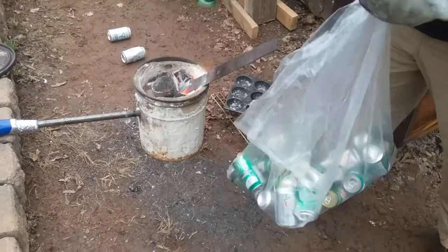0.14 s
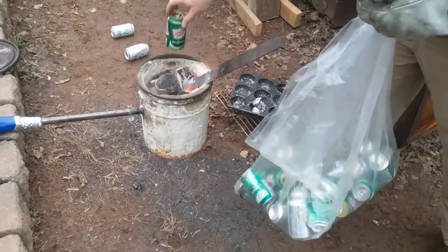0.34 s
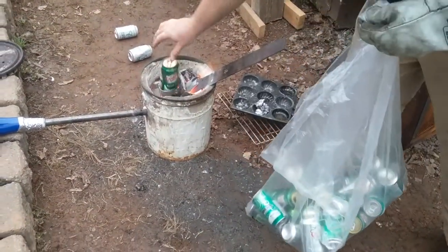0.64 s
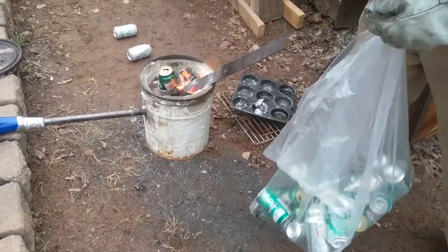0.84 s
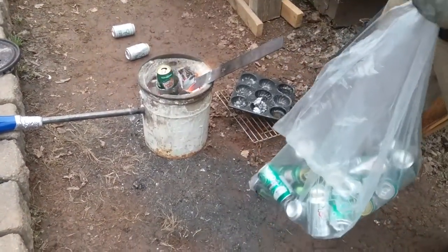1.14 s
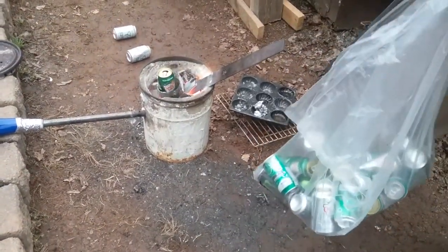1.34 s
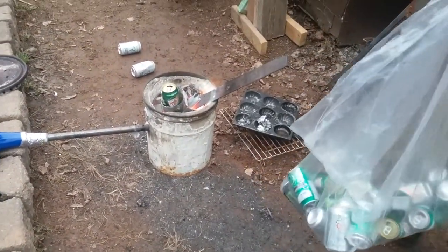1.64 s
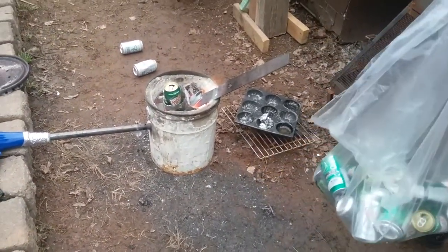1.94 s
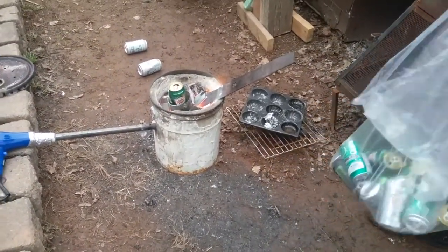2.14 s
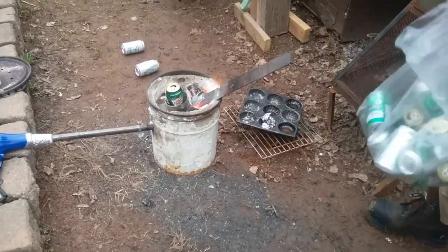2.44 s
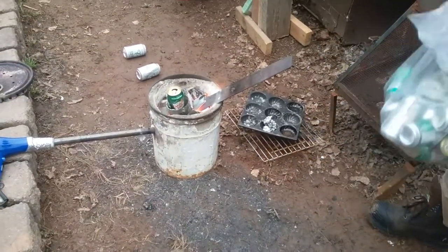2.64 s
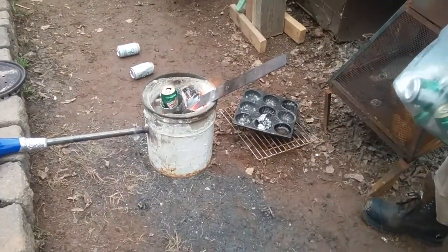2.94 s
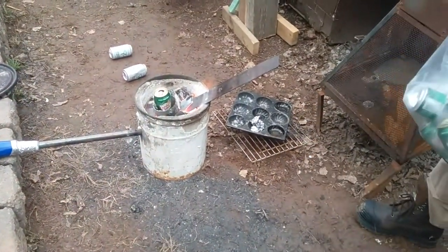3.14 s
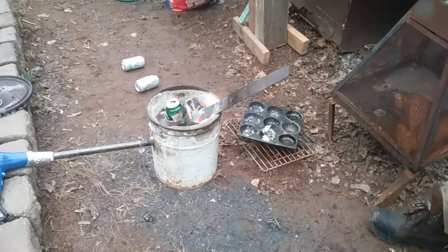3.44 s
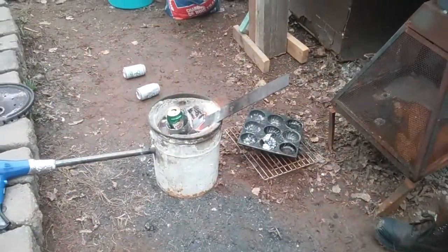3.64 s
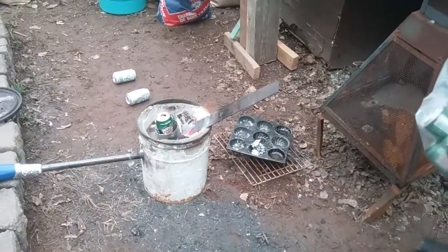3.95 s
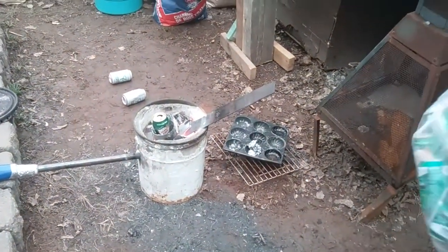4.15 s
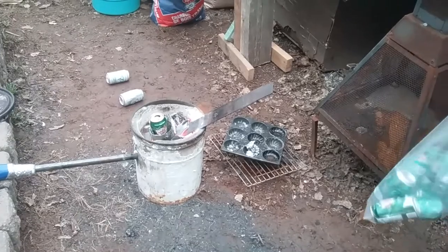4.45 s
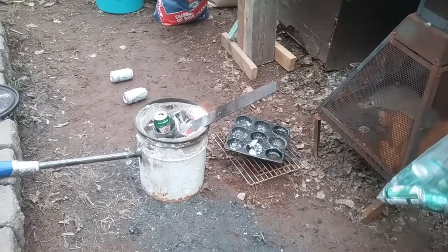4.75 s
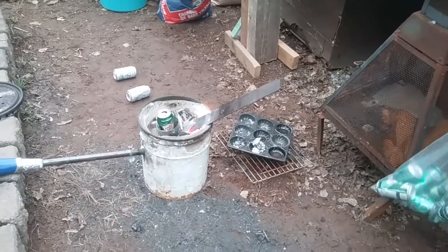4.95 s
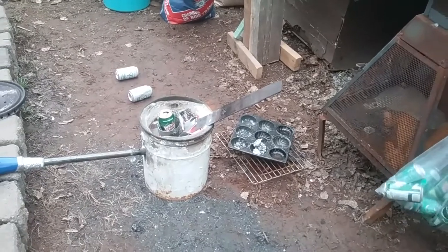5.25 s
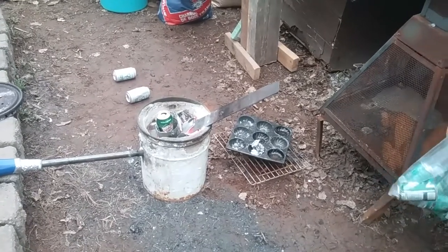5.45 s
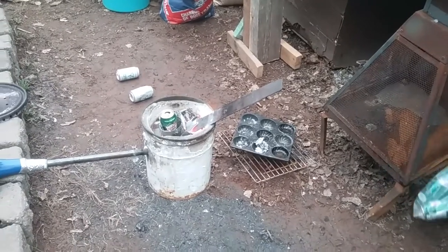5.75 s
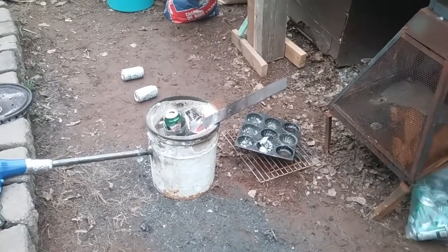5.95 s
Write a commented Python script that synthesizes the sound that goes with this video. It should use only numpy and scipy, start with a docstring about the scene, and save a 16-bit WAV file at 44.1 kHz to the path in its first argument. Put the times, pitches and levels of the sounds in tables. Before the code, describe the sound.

A small forced-air furnace roars steadily outdoors while an empty can clinks into it, then a sack of cans rustles, clatters and crashes down.

```python
"""A hair dryer blows through a pipe into a small bucket furnace in a yard: noise bands make the hollow roar,
flame rumble, hiss and early whistle, two sines the faint motor whine; the roar swells briefly now and then.
An empty can drops into the crucible, ringing as resonant modes, and a faint treble hiss fades after it.
Then a plastic sack of cans is carried off, rustling and clinking, and crashes down on the ground.
The strikes, cracks, film snaps and crash also raise a short tail from the yard; the recorder cuts the top."""
import sys
import numpy as np
from scipy import signal
from scipy.fft import rfft, irfft
from scipy.io import wavfile
from scipy.ndimage import uniform_filter1d, map_coordinates

SR = 44100
rng = np.random.default_rng(int(sys.argv[2]) if len(sys.argv) > 2 else 0)


def digitize_waveform(pressure):
    """Quantize a signal to 16-bit integers and store it at the path in sys.argv[1].

    Rows of a 2-D input are taken as channels; values are limited to [-1, 1].
    """
    field = np.atleast_2d(pressure).T
    bounded = np.clip(field, -1, 1)
    quanta = np.round(bounded * 32767).astype(np.int16)
    wavfile.write(sys.argv[1], SR, quanta)


N = 269075
T = np.arange(N) / SR  # time axis of the scene [s]
RING = T[:SR // 7]  # time axis of one ring [s]

# Air stream and the fire it feeds: (time [s], flame rumble [dB], hollow roar [dB], jet hiss [dB])
AIR_AND_FIRE = [(0, -45.5, -41, -48), (.7, -44.5, -39.5, -46), (1.3, -43.5, -40, -47),
                (2.1, -40.5, -39, -46), (2.8, -46, -42.5, -47.5), (3.7, -45.5, -44.5, -49),
                (5.1, -44.5, -43.5, -48.5), (5.7, -44, -41, -50), (6.1, -44, -43.5, -43)]
# Colour of the furnace's hollow: (frequency [Hz], level [dB])
HOLLOW_COLOUR = [(380, -21.5), (480, -13), (555, -0.5), (640, 0.5), (715, -3), (810, -13), (950, -19.5)]
# Colour of the flame: (frequency [Hz], level [dB])
FLAME_COLOUR = [(20, -24), (40, -20), (60, -11), (95, -3.5), (135, -5), (205, -1), (290, -5), (390, -2.5),
                (470, -9), (830, -5), (1000, -6.5), (1200, -18.5)]
# Colour of the air jet: (frequency [Hz], level [dB])
JET_COLOUR = [(1200, 0.5), (1490, 5), (2020, -0.5), (2510, 0.5), (3100, -0.5), (3900, -3), (4250, 0),
              (4800, 2), (5470, -3.5), (6500, 4), (7400, -8.5), (9000, -21), (12000, -20), (15800, -14.5)]
# Dryer fan tones: (frequency before waver [Hz], level at the opening jet level, before waver [dB])
FAN_TONES = [(1107, -57.5), (2214, -67)]
# Colour of the breathy whistle in the pipe: (frequency [Hz], level [dB])
WHISTLE_COLOUR = [(2750, -24), (3000, 0), (3250, -27)]
# Brief swells of the roar: (time [s], rise of the roar [dB])
ROAR_SWELLS = [(.158, 8), (.353, 4), (.604, 4.5), (.732, 6.5), (1.151, 10), (1.204, 7), (1.457, 3.5),
               (2.415, 4.5), (5.413, 4.5), (5.443, 3.5)]

# Modes of an average free can, from the air inside through wall to lid:
# (frequency [Hz], level within its part [dB], t60 [s])
CAN_MODES = [(261, -2.5, 0.16), (292.5, -2.5, 0.37), (336.5, 3, 0.21), (670, -32, 0.044), (928, 4, 0.15),
             (1096, 0.5, 0.15), (1292, -2.5, 0.11), (1430, -5.5, 0.06), (1642, 5, 0.13), (1724, 3, 0.064),
             (1866, -3, 0.25), (2003, -3, 0.14), (2214, -5.5, 0.15), (2332, 2.5, 0.067), (2510, -5.5, 0.11),
             (2820, -19.5, 0.26), (2932, -6, 0.11), (3218, -12, 0.11), (5460, -5, 0.13), (5740, 7.5, 0.037),
             (6000, 2.5, 0.026), (6177, 1, 0.12), (6860, -6.5, 0.079)]
# Colour shared by all can rings, nearly flat, dipping near 9 kHz, lifted at the top:
# (frequency [Hz], level [dB])
CAN_RING_COLOUR = [(130, 0.5), (7200, -0.5), (9000, -3), (16000, 3.5)]
# Dropped can on its rim, then against the side: (time [s], wall [dB], lid relative to the wall [dB])
DROP_STRIKES = [(0.7393, -51, 9), (.7526, -44.5, -1)]
# Colour of the rim's tick on the crucible: (frequency [Hz], level [dB])
RIM_COLOUR = [(3200, -14), (4700, -21), (5500, 0), (7000, 1), (8200, -23.5), (15000, -21.5)]
# Thin skin buckling: (time [s], level before colour [dB])
SKIN_BUCKLES = [(0.7514, -30), (4.1599, -28), (5.881, -21.5), (5.8877, -11), (5.9868, -26)]
# Colour of a buckling can: (frequency [Hz], level [dB])
CRACK_COLOUR = [(150, -42), (900, -23), (2000, -10), (3200, 0), (4500, -1), (6400, 2), (7300, -2),
                (8800, -17), (11000, -21.5), (15500, -13)]
# What the yard and the heap of cans give back: (frequency [Hz], level [dB])
YARD_COLOUR = [(100, -5.5), (300, 5), (600, 0.5), (1100, -1), (2500, 2.5), (4200, 7), (5400, -6),
               (6500, 2.5), (9000, 2), (15000, 3)]

# Swings of the carried sack: (start [s], length [s], film rustle [dB], jostling cans [dB])
SACK_SWINGS = [(2.257, 0.41, -45, -41), (3.394, 0.15, -50, -39.5), (4.022, 0.24, -48, -38.5),
               (4.473, 0.37, -53, -44.5), (5.202, 0.14, -56, -57)]
# Colour of crinkling film, also used for the hiss after the dropped can: (frequency [Hz], level [dB])
FILM_COLOUR = [(2500, -8), (4000, -6), (6400, 10), (7500, 1), (9000, -10.5), (11000, -10), (15500, -5)]
# Knocks between cans in the sack: (time [s], wall [dB], then relative to the wall:
# air cavity [dB], slow flex [dB], upper wall [dB], lid [dB])
CAN_KNOCKS = [(2.283, -44, -10, 2.5, -1, 1), (2.291, -49.5, -7, 8, 7, 4), (2.3256, -31, -4, -8, -4, -5),
              (2.3444, -39, -16, -1, -8, -17), (2.478, -45.5, -20, -15, -11, -16),
              (2.5005, -38, -22, -3.5, -14, -27), (2.5491, -42, -19, -9, -12, -18),
              (2.589, -47, -3.5, -1, -3, -5), (3.2945, -56.5, 14, 3, -11, -2),
              (3.3372, -51, 1, 1, -0.5, -6), (3.4154, -38.5, -5.5, -5, -2.5, 0.5),
              (3.4362, -42, -3, -20, -9, -4.5), (3.487, -40.5, -25, -5.5, 0, -9),
              (3.9692, -51, 4, 4.5, -16, -5), (4.0337, -41, -5.5, -24, -7, -23),
              (4.115, -32.5, -5.5, -10, -4, -8), (4.1628, -53, 3, -15, 5, 1),
              (4.3073, -48.5, -16, 0.5, -13, -4.5), (4.4849, -37, -12.5, -7.5, -25, -21),
              (4.6382, -49.5, -13, -13, -18, -14), (4.6603, -46.5, -7, -3, -21, -27),
              (4.741, -51.5, -0.5, 8.5, -6, -12), (4.7907, -50.5, -8, 2, -10, -12),
              (5.001, -40, -9.5, 6, -1, -16), (5.881, -37, -2, 0.5, -11, 4.5),
              (5.887, -32, -19, 0, -14, -1.5), (5.9053, -34.5, -2.5, 1, 0, -3),
              (5.945, -39.5, -3, -18, 3, -10), (5.9874, -42.5, 5, 0, 2, 2)]
# Taut film snapping as the load shifts: (time [s], level before colour [dB])
TAUT_SNAPS = [(4.116, -31), (4.161, -24), (4.4852, -29.5)]
# Colour of those snaps: (frequency [Hz], level [dB])
SNAP_COLOUR = [(3000, -9), (7000, 0.5), (9000, -9), (11500, -7.5), (15500, -8)]
# Sack meeting the ground, before the envelopes: (thud [dB], tumbling cans [dB], crunch [dB])
LANDING_LEVELS = (-28.5, -19, -12)
# Colour of the sack on soil: (frequency [Hz], level [dB])
SOIL_COLOUR = [(70, -4), (130, -14), (190, 10), (320, 3.5), (450, -6), (650, -25)]

# Fire and jet wander: spread [dB] and changes a second
SURGE_DB, SURGE_RATE = 1.58, 32
JET_WANDER_DB, JET_WANDER_RATE = .5, 9.8
# The hollow's pitch drifts with the heat of the gas: share, and changes a second
DRIFT_SHARE, DRIFT_RATE = .04, 6
# Fan waver: share of its speed, and of its level [dB]
FAN_WAVER_SHARE, FAN_WAVER_DB = .0015, 2.5
# Whistle: level [dB], start of its fade [s], speed of the fade [dB per s]
WHISTLE_DB, WHISTLE_UNTIL_S, WHISTLE_FADE_DB_S = -60, 0.86, 18
# Roar swell shape [s], and the peak of its low bump over the swollen roar's level [dB]
SWELL_ATTACK_S, SWELL_HOLD_S, SWELL_RELEASE_S, BUMP_DB = 0.0067, 0.0076, 0.032, 3

LID_HZ = 5950  # lid pitch of an average can
# Dropped can: parts relative to its wall [dB], lid pitch [Hz], ring time relative to a free can
DROP_CAVITY_DB, DROP_FLEX_DB, DROP_UPPER_DB = -21, -27, -4
DROP_LID_HZ, DROP_RING_TIME = 6060, 0.48
RIM_DB, RIM_T60_S = -12.5, 0.036  # tick level before colour
HISS_TAIL_DB, HISS_TAIL_T60_S = -44, 0.7  # faint treble hiss after the second strike

# How fast film and cans stir before a swing and settle after it [dB per s]
FILM_STIR_DB_S, FILM_SETTLE_DB_S = 87, 25
CANS_STIR_DB_S, CANS_SETTLE_DB_S = 77, 47
# Nudges a second in the carried sack and in the landing one
JOSTLE_RATE, TUMBLE_RATE = 170, 1000
# Sack knocks: chatter decay [s], ring time relative to a free can, tick before colour relative to the lid [dB]
CHATTER_S, RING_TIME, TICK_DB = 0.0094, 0.63, -16
LANDING_S = 5.887
TOP_HZ = 15900  # top of the recorder's band


def undb(db):
    """Decibels to gain."""
    return 10 ** (np.asarray(db) / 20)


def unit(x):
    """Scale to rms 1."""
    return x / np.sqrt(np.mean(x ** 2) + 1e-18)


def curves(table):
    """The columns of a table, joined by straight lines in time."""
    s, *columns = np.transpose(table)
    return [np.interp(T, s, column) for column in columns]


def colour(x, points, size=2048):
    """Causal minimum-phase filter through (Hz, dB) points, falling steeply beyond both ends."""
    hz, db = np.transpose(points)
    octave = np.log2(np.maximum(np.arange(size + 1) * SR / (2 * size), 1))
    outside = np.abs(octave - np.clip(octave, np.log2(hz[0]), np.log2(hz[-1])))
    gain_db = np.interp(octave, np.log2(hz), db) - np.minimum(30 * outside, 60)
    # folding the cepstrum forward in time makes the filter causal
    cepstrum = irfft(np.log(undb(gain_db)))
    cepstrum[1:size] *= 2
    cepstrum[size + 1:] = 0
    impulse = irfft(np.exp(rfft(cepstrum)))[:size]
    return signal.fftconvolve(x, impulse)[:len(x)]


def walk(rate):
    """Random levels held 1 / rate s and slewed twice; rms 1."""
    hold = max(int(SR / rate), 2)
    steps = np.repeat(rng.standard_normal(N // hold + 1), hold)
    slewed = uniform_filter1d(uniform_filter1d(steps, hold), hold)
    return unit(slewed[:N])


def fade(t, t60):
    """Exponential decay, 60 dB in t60 seconds."""
    return np.exp(-np.log(1000) * t / np.maximum(t60, 1e-4))


def add(track, s, sound):
    """Mix a sound into a track at time s."""
    i = int(np.clip(s * SR, 0, N - 1))
    track[i:i + len(sound)] += sound[:N - i]


def turbulence(points, flutter_db, flutter_rate):
    """Coloured noise whose level flutters with the eddies."""
    noise = colour(rng.standard_normal(N), points)
    return unit(noise * undb(flutter_db * walk(flutter_rate)))


def furnace():
    """Forced air booms in the furnace's hollow, the flame rumbles and the jet hisses."""
    rumble_db, roar_db, hiss_db = curves(AIR_AND_FIRE)
    # reading the noise at a varying speed bends its pitch
    drifting = np.cumsum(1 + DRIFT_SHARE * walk(DRIFT_RATE))
    boom = turbulence(HOLLOW_COLOUR, flutter_db=1.47, flutter_rate=54)
    hollow = map_coordinates(boom, [drifting], mode="mirror")
    roar = hollow * undb(roar_db + SURGE_DB * walk(SURGE_RATE) + roar_swells())
    rumble = turbulence(FLAME_COLOUR, flutter_db=2.0, flutter_rate=14) * undb(rumble_db)
    jet = turbulence(JET_COLOUR, flutter_db=.4, flutter_rate=25)
    hiss = jet * undb(hiss_db + JET_WANDER_DB * walk(JET_WANDER_RATE))
    return roar + low_bumps(roar_db) + rumble + hiss + fan(hiss_db)


def fan(hiss_db):
    """The fan whines faintly as wavering sines, louder when the jet is."""
    fan_time = np.cumsum(1 + FAN_WAVER_SHARE * walk(3)) / SR
    whine = sum(undb(db) * np.sin(2 * np.pi * hz * fan_time) for hz, db in FAN_TONES)
    return whine * undb(FAN_WAVER_DB * walk(11) + hiss_db - hiss_db[0])


def whistle():
    """A faint, unsteady edge tone in the blow pipe, made of narrow noise, that dies away."""
    fading_db = WHISTLE_DB - WHISTLE_FADE_DB_S * np.maximum(T - WHISTLE_UNTIL_S, 0)
    return turbulence(WHISTLE_COLOUR, flutter_db=4.5, flutter_rate=20.4) * undb(fading_db)


def roar_swells():
    """Rise of the roar (dB): each brief swell jumps up, holds and sinks back."""
    corners = np.cumsum([0, SWELL_ATTACK_S, SWELL_HOLD_S, SWELL_RELEASE_S])
    return sum(np.interp(T - s, corners, [0, db, db, 0]) for s, db in ROAR_SWELLS)


def low_bumps(roar_db):
    """Each swell of the roar starts with a soft low bump: one impulse through the hollow's colour."""
    bump = colour(signal.unit_impulse(len(RING)), HOLLOW_COLOUR)
    bump = bump / np.abs(bump).max()
    out = np.zeros(N)
    for s, db in ROAR_SWELLS:
        add(out, s, undb(db + BUMP_DB) * bump)
    return out * undb(roar_db)


def can(push, lid_hz, ring_time, detune, scatter_db):
    """A pushed can rings in five parts: air cavity, slow flex, wall, upper wall and lid."""
    hz, db, t60 = np.transpose(CAN_MODES)
    part = np.digitize(hz, [450, 1350, 2150, 4500])  # edges between the parts in Hz
    # each can is dented and struck differently, so its modes shift and trade strength
    shift, strength, side = rng.standard_normal((3, len(hz)))
    lid_shift = np.where(part == 4, lid_hz / LID_HZ, 1)
    hz = hz * (1 + detune * shift) * lid_shift
    gain = undb(db + scatter_db * strength) * np.sign(side)
    keep_per_sample = fade(1 / SR, t60 * ring_time)
    parts = np.zeros((part.max() + 1, len(push)))
    for k, f, g, keep in zip(part, hz, gain, keep_per_sample):
        resonance = [1, -2 * keep * np.cos(2 * np.pi * f / SR), keep ** 2]
        parts[k] += signal.lfilter([g, 0, -g], resonance, push)
    return parts


def contact(length, chatter):
    """A first touch followed by a dying chatter of thin metal."""
    touched = rng.random(len(RING)) < 900 / SR  # about 900 touches a second
    touches = rng.standard_normal(len(RING)) * touched
    push = chatter * touches * np.exp(-RING / max(length, .0005))
    push[0] = 1
    return push


def voice(parts, shares_db):
    """Sum the parts of a ring, each at its own level."""
    return sum(undb(db) * unit(part) for db, part in zip(shares_db, parts))


def knock(shares_db, lid_hz, ring_time, length):
    """Two metal skins chatter against each other and ring, slightly out of tune."""
    first = can(contact(length, chatter=0.51), lid_hz, ring_time, detune=0.013, scatter_db=3.5)
    second = can(contact(length, chatter=0.66), lid_hz, ring_time, detune=0.0631, scatter_db=-1.0)
    return voice(first + 0.93 * second, shares_db)


def dropped_can():
    """A can strikes the crucible with its rim and tips against the side; a faint treble hiss fades after."""
    out = np.zeros(N)
    for s, db, lid_db in DROP_STRIKES:
        shares_db = [DROP_CAVITY_DB, DROP_FLEX_DB, 0, DROP_UPPER_DB, lid_db]
        add(out, s, undb(db) * knock(shares_db, DROP_LID_HZ, DROP_RING_TIME, length=.006))
    rim_s, side_s = DROP_STRIKES[0][0], DROP_STRIKES[-1][0]
    tick = colour(rng.standard_normal(len(RING)) * fade(RING, RIM_T60_S), RIM_COLOUR)
    add(out, rim_s, undb(RIM_DB) * tick)
    t = T[:SR // 2]
    hiss_tail = unit(colour(rng.standard_normal(len(t)), FILM_COLOUR)) * fade(t, HISS_TAIL_T60_S)
    add(out, side_s, undb(HISS_TAIL_DB) * hiss_tail)
    return colour(out, CAN_RING_COLOUR)


def noise_snap(db, t60):
    """A sudden burst of noise that dies at once, like thin material letting go."""
    return undb(db) * rng.standard_normal(len(RING)) * fade(RING, t60)


def buckles():
    """Thin can skin buckles with a crack."""
    cracks = np.zeros(N)
    for s, db in SKIN_BUCKLES:
        add(cracks, s, noise_snap(db, t60=0.1))
    return colour(cracks, CRACK_COLOUR)


def yard(x, t60, wet_db):
    """Ground, wall and sheet metal nearby scatter a short tail."""
    t = T[:SR * 3 // 4]
    envelope = fade(t, t60) * (1 - np.exp(-t / 0.0071))
    tail = colour(rng.standard_normal(len(t)) * envelope, YARD_COLOUR)
    return undb(wet_db) * signal.fftconvolve(x, tail / np.linalg.norm(tail))[:N]


def swell(start, length, stir, settle):
    """Gain that rises at stir dB a second, holds for a length and falls at settle dB a second."""
    before = np.maximum(start - T, 0)
    after = np.maximum(T - start - length, 0)
    return undb(-stir * before - settle * after)


def heap(size, rate, shares_db, spread_db, count=8):
    """Many differently dented cans nudge each other at random, about rate times a second in all."""
    out = np.zeros(size)
    for _ in range(count):
        nudges = np.zeros(size)
        nudge_count = int(rate / count * size / SR) + 1
        places = rng.integers(size, size=nudge_count)
        strengths = undb(spread_db * rng.standard_normal(nudge_count))
        nudges[places] = rng.choice([-1, 1], nudge_count) * strengths
        push = contact(0.0044, chatter=0.81)
        parts = can(push, LID_HZ, ring_time=0.57, detune=0.0834, scatter_db=1)
        out += signal.oaconvolve(nudges, voice(parts, shares_db))[:size]
    return unit(colour(out, CAN_RING_COLOUR))


def sack():
    """With each swing the film crinkles in tiny snaps while the cans inside jostle."""
    rustles = [undb(film_db) * swell(s, length, FILM_STIR_DB_S, FILM_SETTLE_DB_S)
               for s, length, film_db, _ in SACK_SWINGS]
    jostles = [undb(cans_db) * swell(s, length, CANS_STIR_DB_S, CANS_SETTLE_DB_S)
               for s, length, _, cans_db in SACK_SWINGS]
    snapped = rng.random(N) < 5000 / SR  # about 5000 tiny snaps a second
    snaps = snapped * rng.standard_normal(N) * undb(0.86 * rng.exponential(size=N))
    film = unit(colour(snaps, FILM_COLOUR))
    cans = heap(N, JOSTLE_RATE, shares_db=[0.5, 2.5, -3, -3.0, -11], spread_db=4.5)
    return np.max(rustles, axis=0) * film + np.max(jostles, axis=0) * cans


def clinks():
    """Cans in the sack knock together with a ring and a tick."""
    rings, ticks = np.zeros((2, N))
    for s, db, cavity_db, flex_db, upper_db, lid_db in CAN_KNOCKS:
        shares_db = [cavity_db, flex_db, 0, upper_db, lid_db]
        add(rings, s, undb(db) * knock(shares_db, LID_HZ, RING_TIME, CHATTER_S))
        add(ticks, s, noise_snap(db + lid_db + TICK_DB, t60=0.1))
    return colour(rings, CAN_RING_COLOUR) + colour(ticks, CRACK_COLOUR)


def film_snaps():
    """Taut plastic lets go with short bright snaps."""
    out = np.zeros(N)
    for s, db in TAUT_SNAPS:
        add(out, s, noise_snap(db, t60=0.043))
    return colour(out, SNAP_COLOUR)


def landing():
    """The sack thuds on the soil, the lowest cans crunch and the rest tumble to rest above them."""
    t = T[:SR // 4]
    thud_db, tumble_db, crunch_db = LANDING_LEVELS
    # each part swells in over a few milliseconds, then fades
    thud = unit(colour(rng.standard_normal(len(t)), SOIL_COLOUR))
    thud *= fade(t, 0.29) * (1 - np.exp(-t / 0.0046))
    tumble = heap(len(t), TUMBLE_RATE, shares_db=[0, 8, 5, 2.0, 3.5], spread_db=5.5)
    tumble *= fade(t, 0.4) * (1 - np.exp(-t / 0.011))
    crunch = unit(colour(rng.standard_normal(len(t)), CRACK_COLOUR))
    crunch *= fade(t, 0.063) * (1 - np.exp(-t / 0.0012))
    out = np.zeros(N)
    add(out, LANDING_S, undb(thud_db) * thud + undb(tumble_db) * tumble + undb(crunch_db) * crunch)
    return out


def scene():
    """The furnace runs on while the cans are handled beside it; one microphone channel."""
    blows = dropped_can() + buckles() + clinks() + film_snaps() + landing()
    tail = yard(blows, t60=0.41, wet_db=-8.0)
    return (furnace() + whistle() + sack() + blows + tail)[None]


def record(dry):
    """The recorder cuts the top with a steep low-pass."""
    top_cut = signal.ellip(10, .2, 70, TOP_HZ, fs=SR, output="sos")
    return signal.sosfilt(top_cut, dry)


dry = scene()
out = record(dry)
digitize_waveform(out)
```